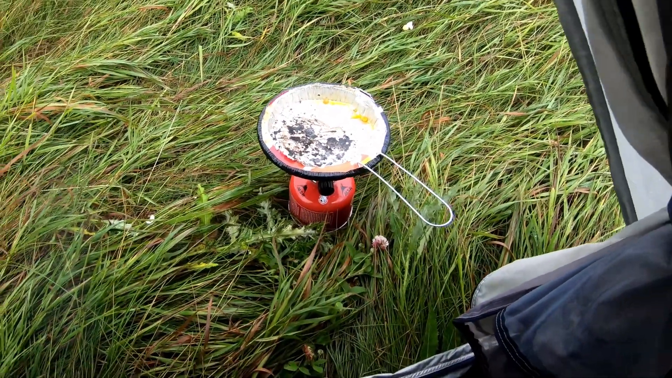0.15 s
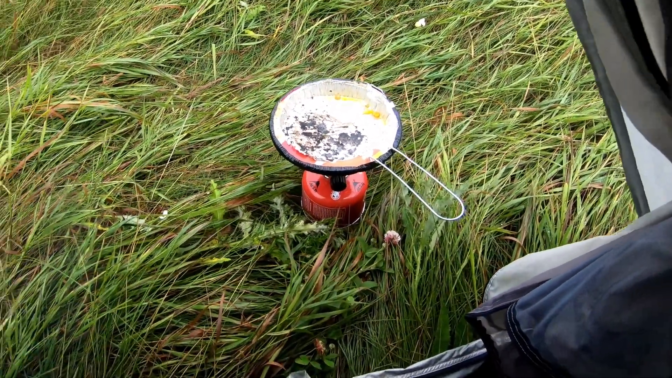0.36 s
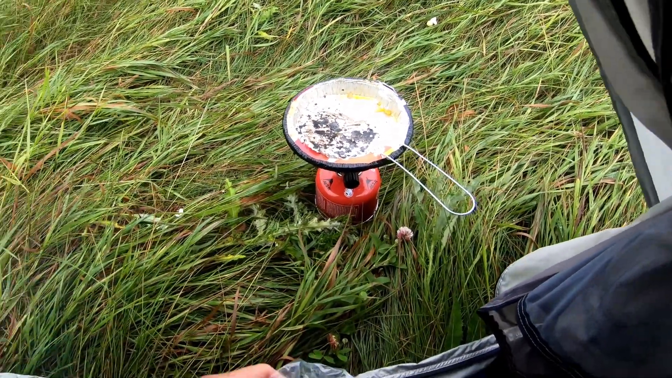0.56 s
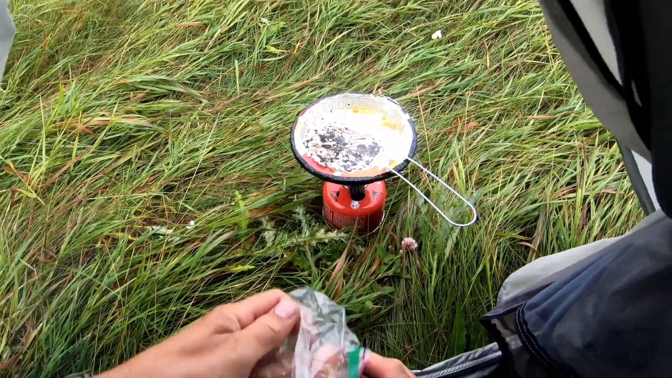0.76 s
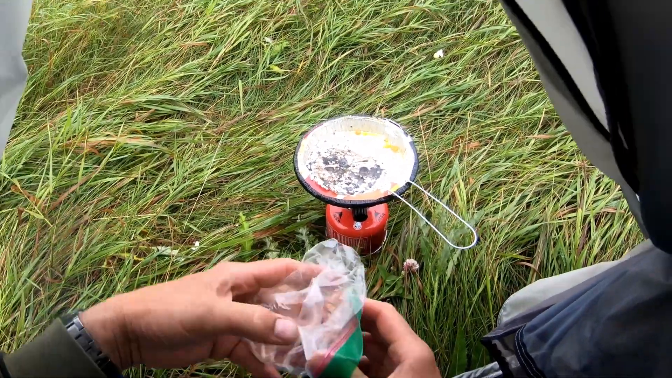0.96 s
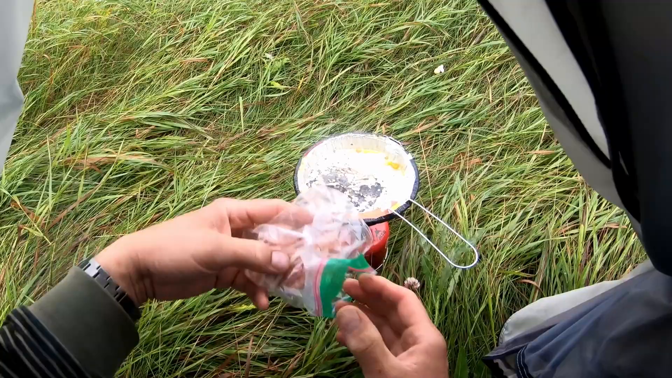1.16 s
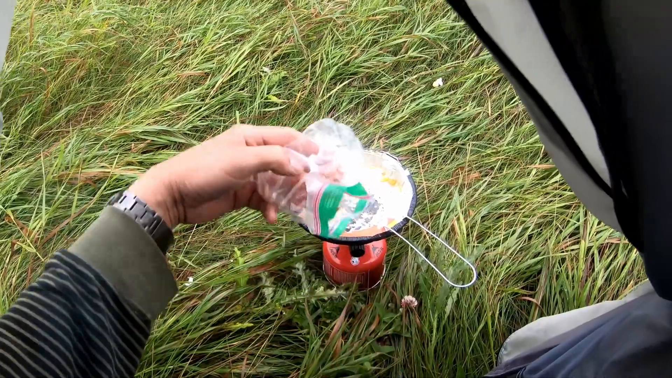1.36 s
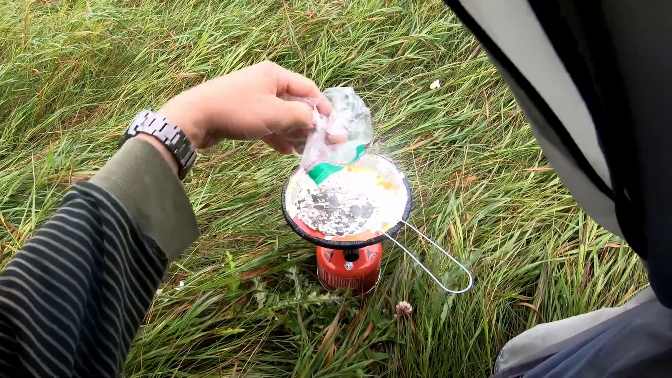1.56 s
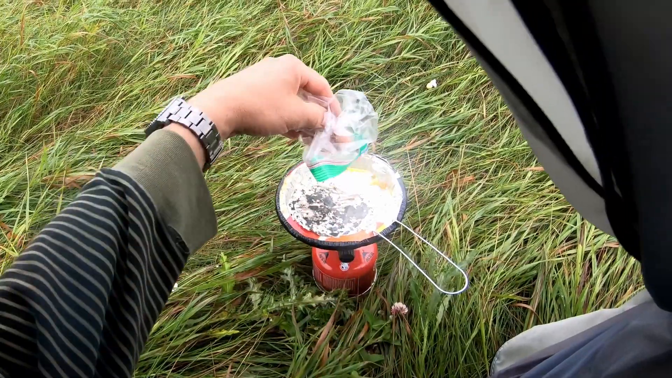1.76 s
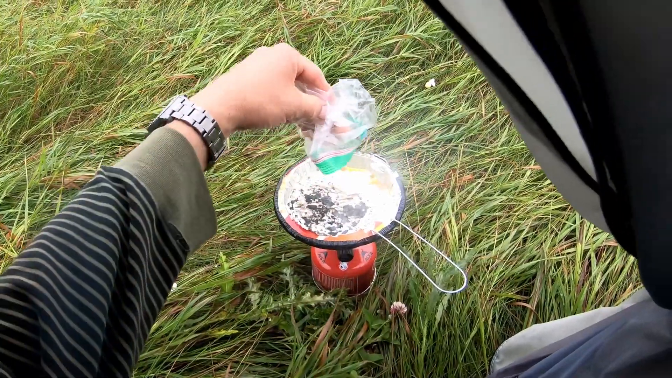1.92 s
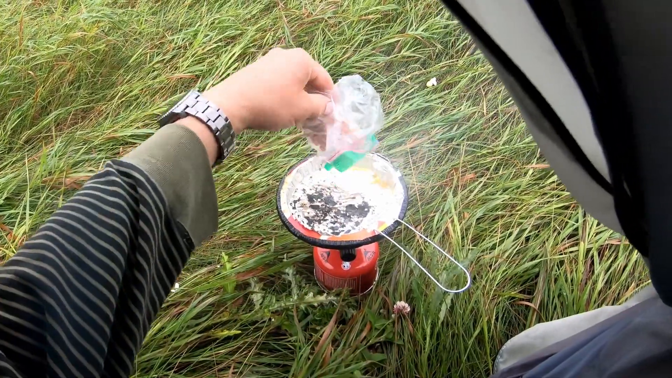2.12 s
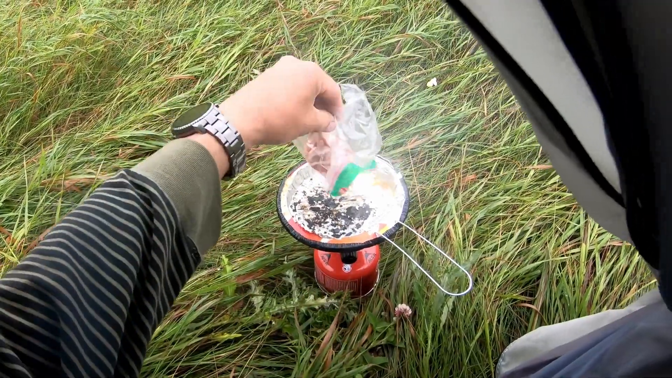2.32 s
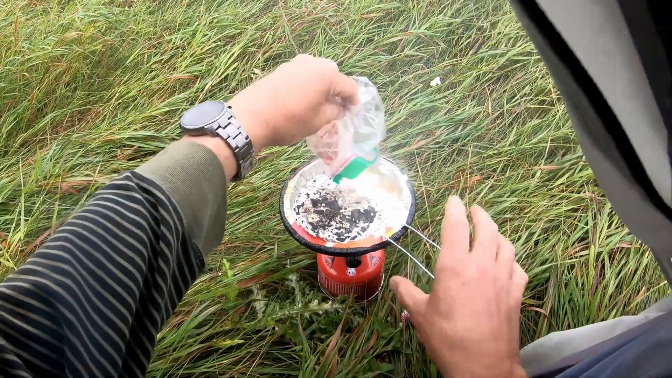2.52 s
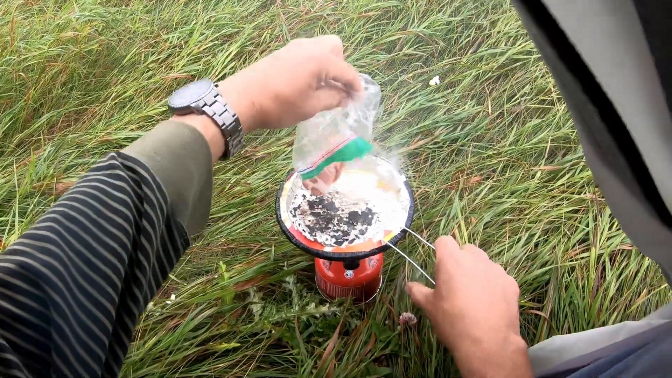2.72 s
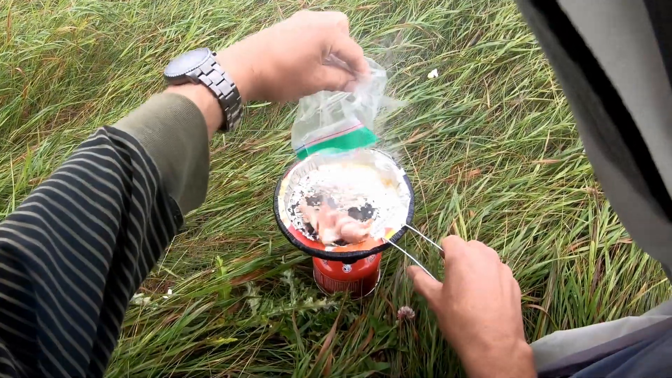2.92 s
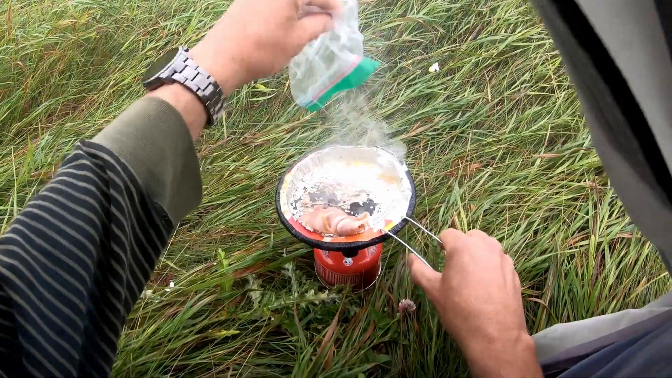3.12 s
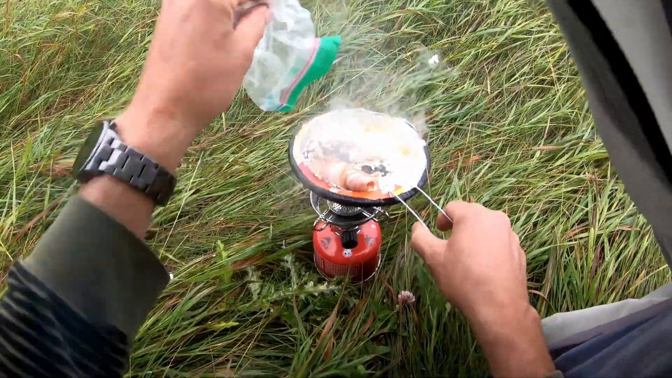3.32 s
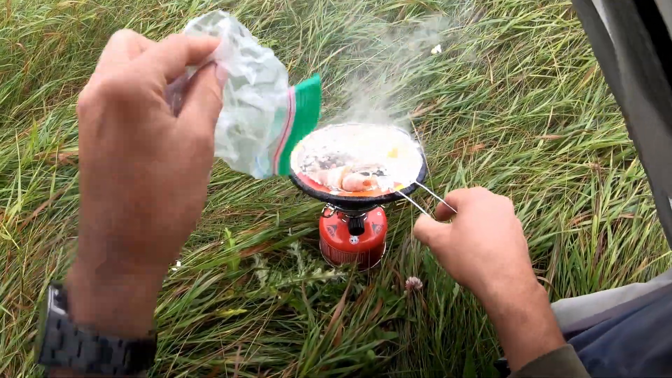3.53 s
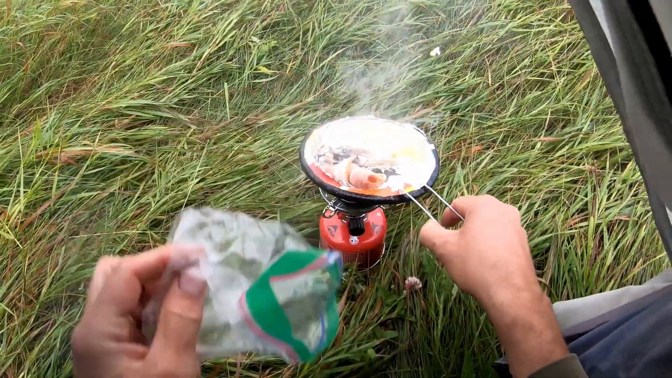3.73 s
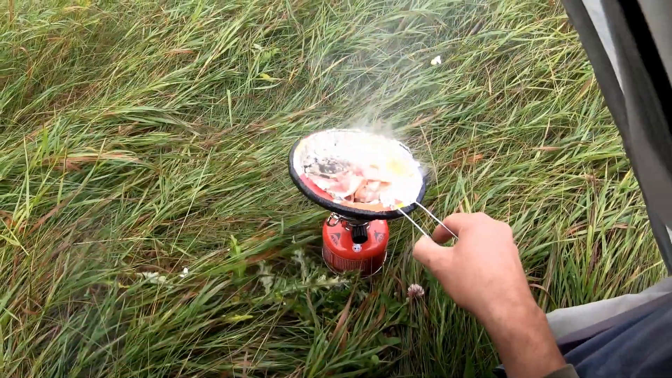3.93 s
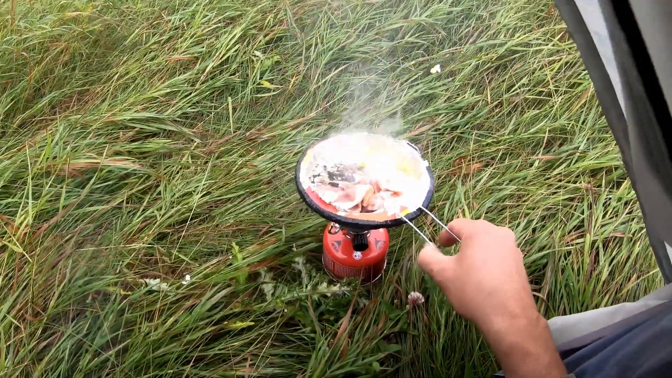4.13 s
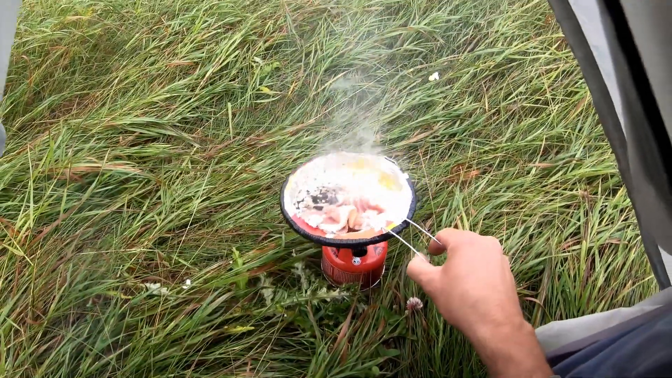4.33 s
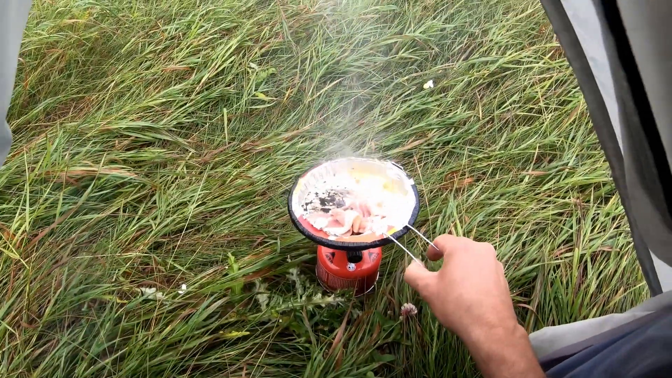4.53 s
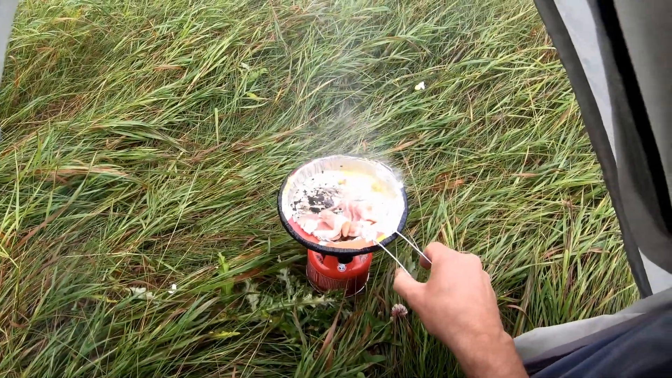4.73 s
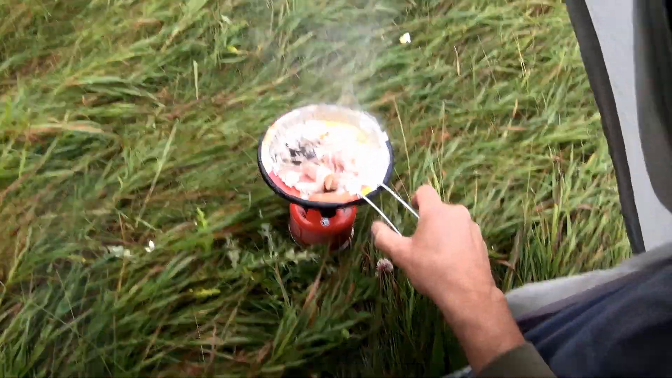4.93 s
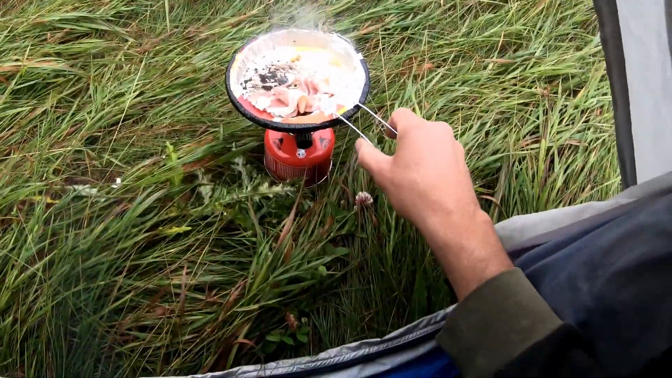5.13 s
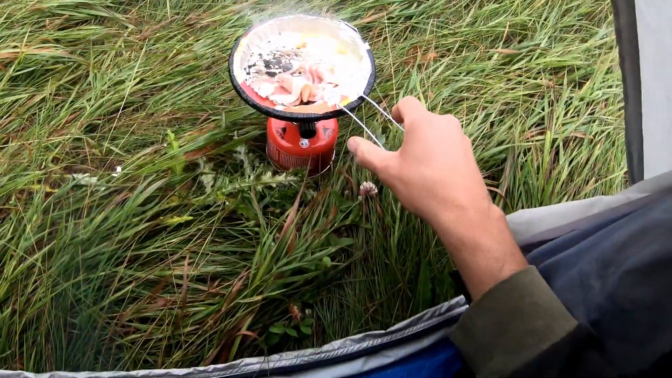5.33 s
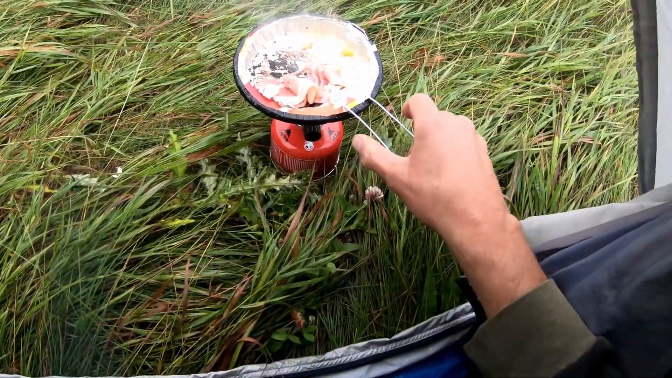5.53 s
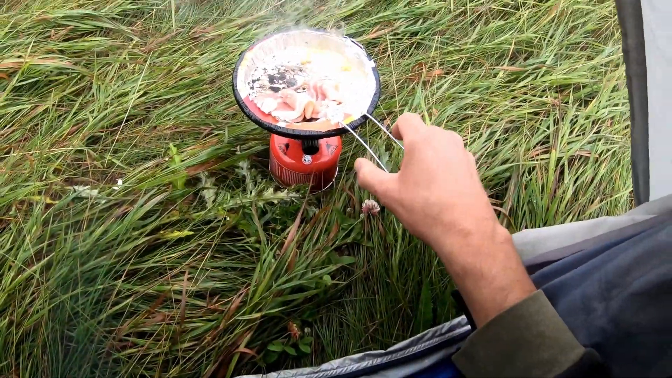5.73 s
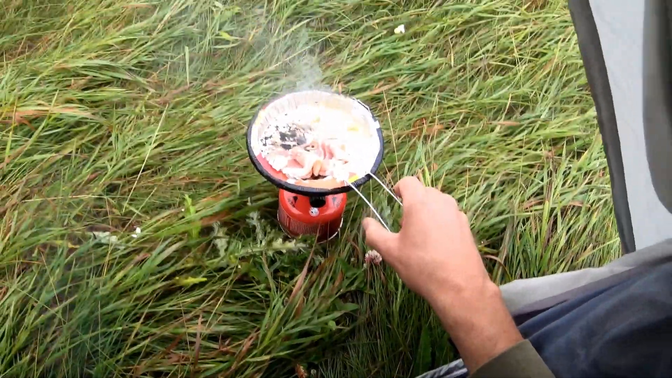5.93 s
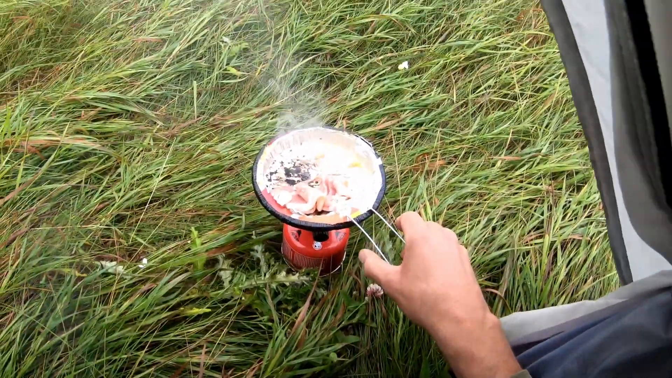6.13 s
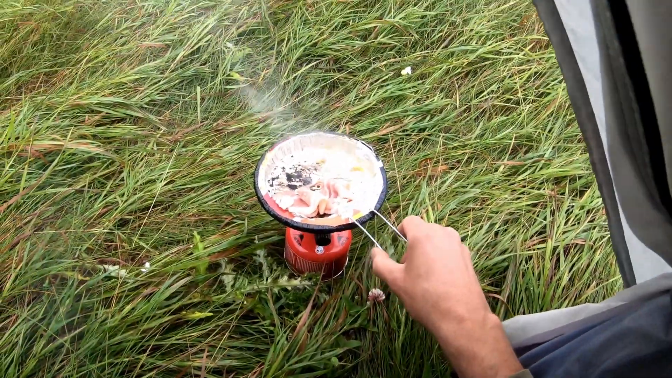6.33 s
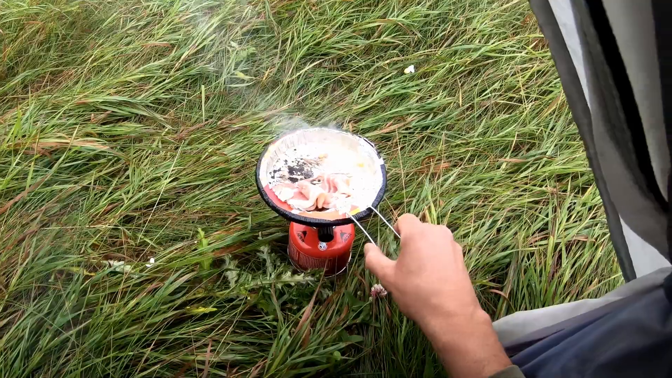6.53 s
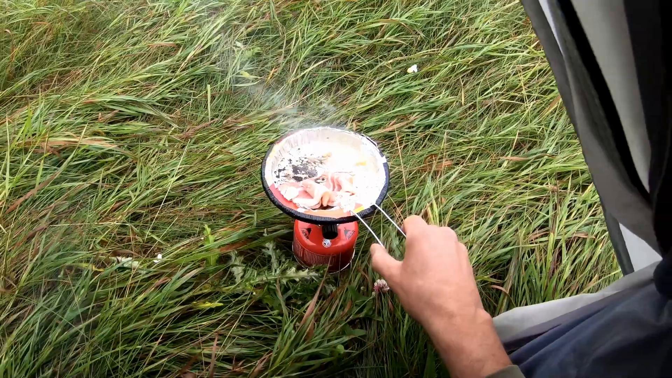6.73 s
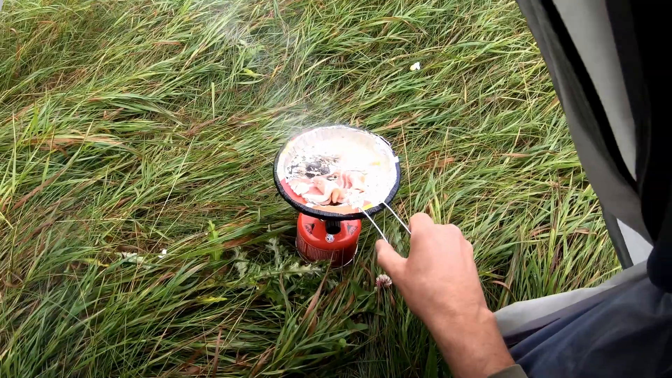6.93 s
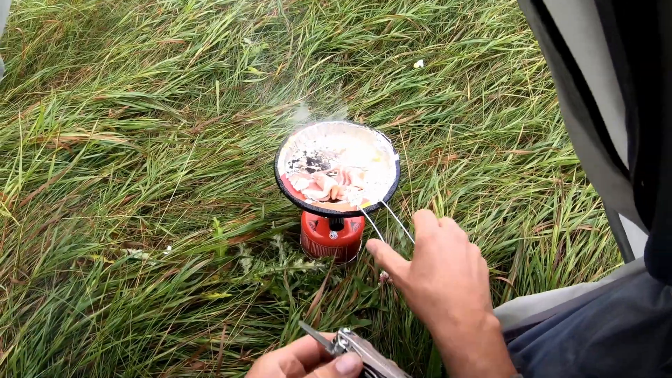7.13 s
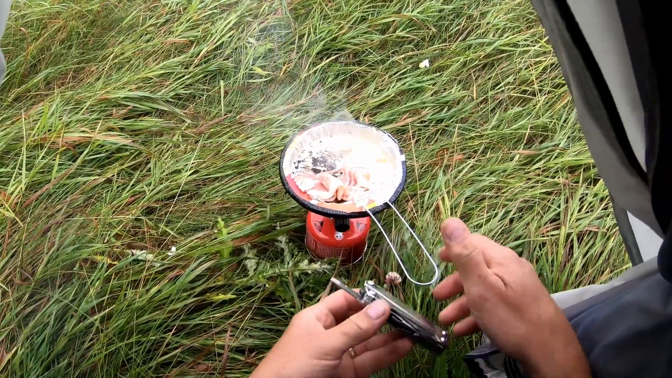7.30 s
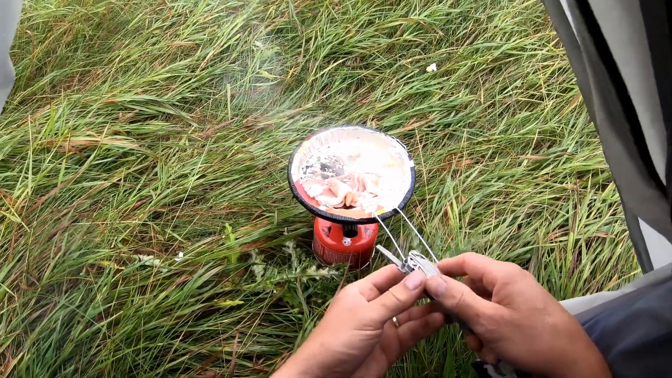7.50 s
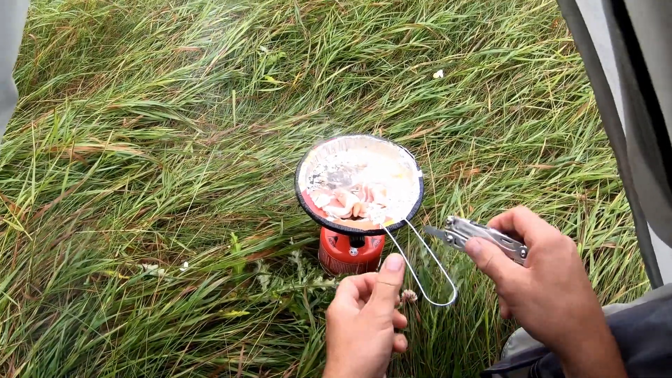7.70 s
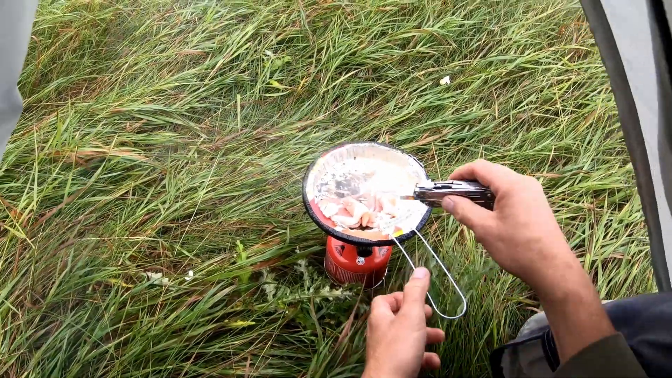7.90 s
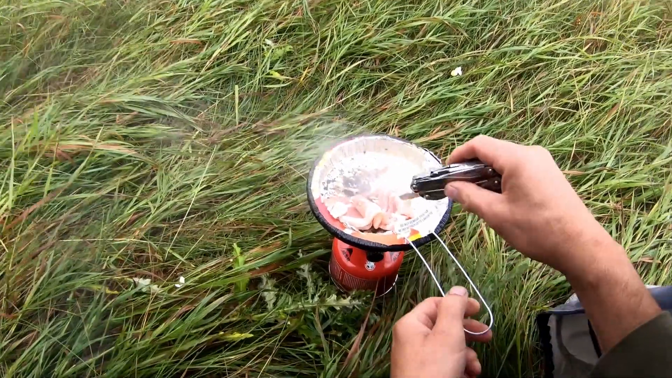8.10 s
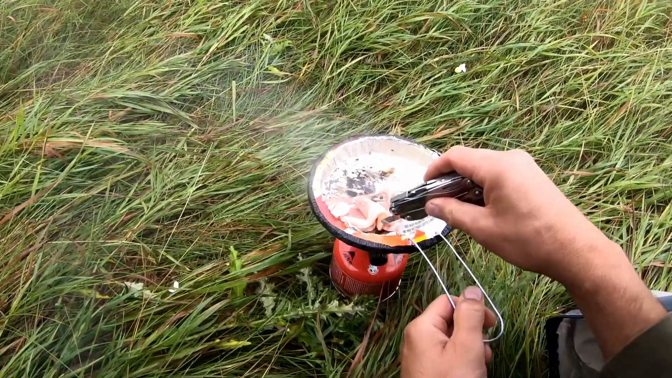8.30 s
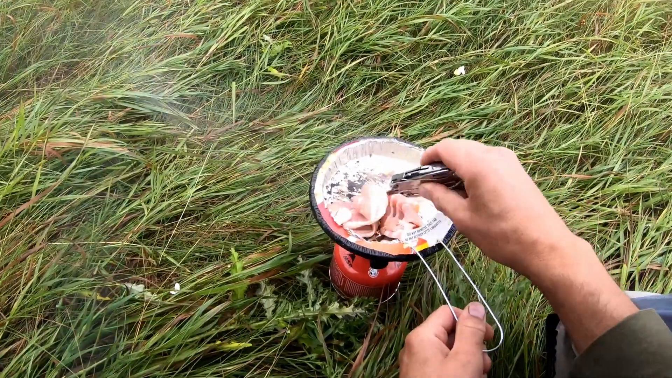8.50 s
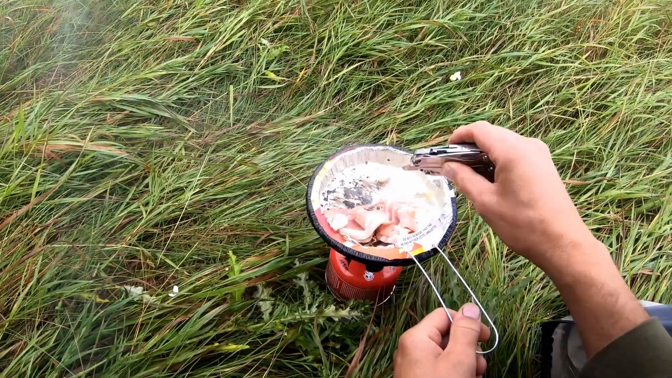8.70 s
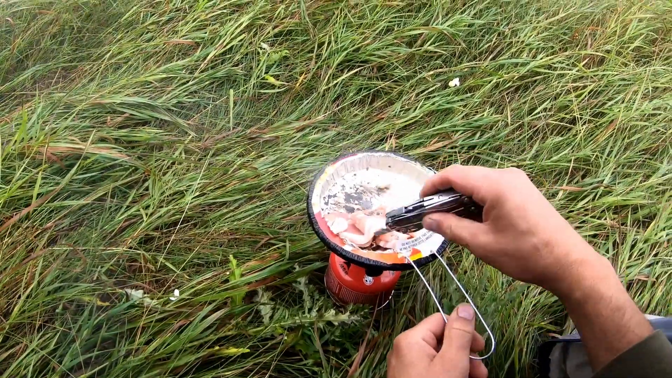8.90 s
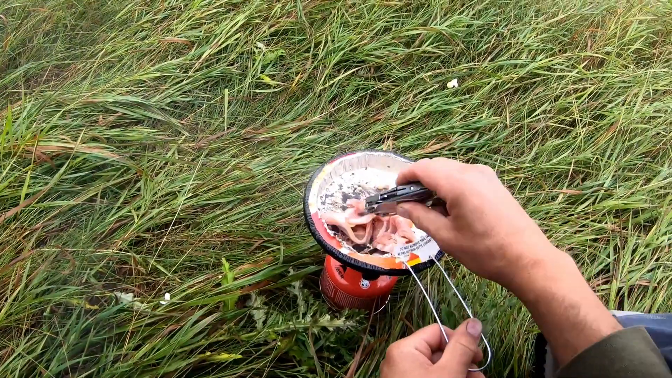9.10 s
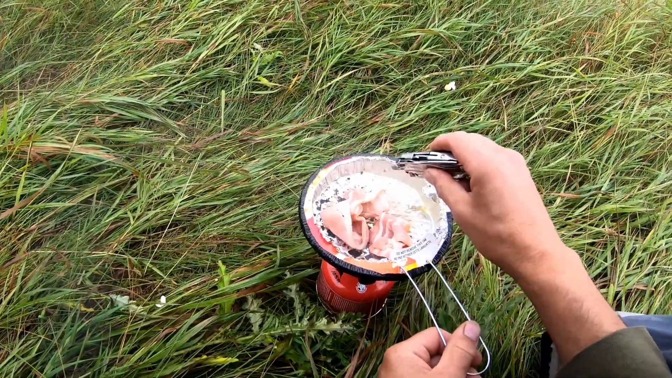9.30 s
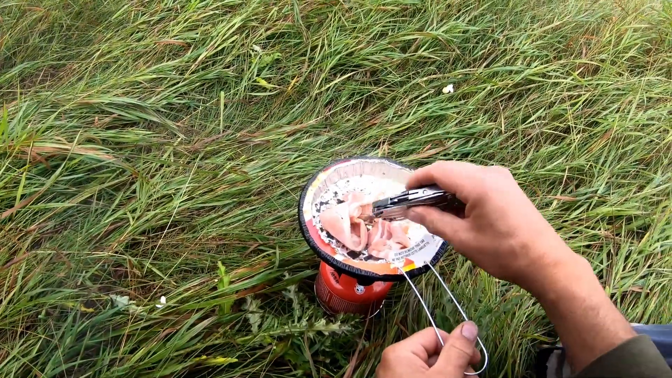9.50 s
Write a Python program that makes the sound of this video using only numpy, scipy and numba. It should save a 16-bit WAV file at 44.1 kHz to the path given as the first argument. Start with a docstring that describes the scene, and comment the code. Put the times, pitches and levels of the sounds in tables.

```python
"""Outdoors, in grass by a tent, a gas burner roars softly as low band-limited noise and a breeze rumbles in gusts.
For the first 2.9 s a plastic bag is shaken: avalanches of clicks crinkle through the film's gliding resonances.
Bacon then drops into a hot foil-lined pan: random bubble clicks, tinted by drifting resonances, make the sizzle.
Fat pops as damped rings, most densely near 4 s as the pan is shifted, amid dull thuds that sink in pitch.
After 8.3 s pliers scrape the foil in stick-slip bursts, and the sizzle flares as they turn the rashers."""
import sys
import numpy as np
from scipy import signal
from scipy.fft import rfft, irfft, next_fast_len
from scipy.io import wavfile
from scipy.ndimage import uniform_filter1d
from numba import njit

SR = 44100
rng = np.random.default_rng(int(sys.argv[2]) if len(sys.argv) > 2 else 0)


def put_to_file(sound):
    """Save the sound as 16-bit audio at rate SR, in the file named by the first command-line argument."""
    columns = np.atleast_2d(sound).T  # one column per channel
    safe = np.clip(columns, -1, 1)
    whole_steps = np.round(safe * 32767)
    wavfile.write(sys.argv[1], SR, whole_steps.astype(np.int16))


N = 421155
T = np.arange(N) / SR  # t/s

# Breeze spectrum: f/Hz, level/dB
BREEZE_SPECTRUM = [(15, 0.5), (30, -11), (50, -1.5), (85, -24), (150, -15), (400, -38)]
# Gusts over the ports: start t/s, length/s, level/dB
GUSTS = [(.18, 0.64, -57), (1.59, 0.093, -54), (2.36, 0.099, -50), (3.34, 0.4, -53), (3.9, 0.23, -49),
         (5.03, 0.076, -51), (7.34, .1, -56), (7.74, .08, -51), (8.09, 0.096, -46), (8.42, .06, -51)]
GUST_ATTACK_S, GUST_RELEASE_S = 0.047, 0.095
CALM_DB, CALM_WANDER_DB = -67.5, 6  # the air between gusts

# Gas flame spectrum: f/Hz, level/dB
BURNER_SPECTRUM = [(40, -27), (80, -7.5), (115, -7), (135, -5), (160, 3.5), (195, 0), (250, -9.5),
                   (400, -23), (1000, -18), (4000, -21), (15000, -33)]
BURNER_DB = -52

# Soft contacts of bacon, bag and hands: t/s, relative level/dB, first f/Hz, last f/Hz, decay/s
BUMPS = [(2.419, -38, 800, 330, .005), (2.818, -36, 750, 450, .003), (2.892, -33, 300, 288, 0.015),
         (2.927, -30.5, 725, 300, 0.0073), (3.934, -34, 400, 400, .003), (3.951, -31, 473, 470, 0.0036),
         (4.048, -33, 340, 330, .004), (4.087, -16.5, 310, 260, 0.002), (4.134, -23.5, 193, 188, 0.0028),
         (4.133, -31, 484, 330, 0.0036), (4.462, -29, 437, 416, 0.0018), (6.078, -36, 230, 225, 0.0043),
         (6.106, -34, 260, 255, .004), (8.179, -34.5, 112, 110, 0.005), (8.424, -33.5, 205, 200, 0.0048)]
BUMP_SAG_S = 0.0039  # time constant of the fall in pitch

# Hollow pops of fat and foil: t/s, relative level/dB, ring f/Hz, crack level relative to the ring/dB
POPS = [(3.245, -28.5, 1370, 1), (3.934, -14.5, 1923, -3), (3.9505, -14.5, 1380, -2),
        (3.971, -30, 1500, -6), (3.992, -26, 530, -17), (4.009, -25.5, 1620, 5), (4.0645, -23.5, 1120, -6),
        (4.0705, -34, 1200, -8), (4.131, -27, 890, -10), (4.143, -37, 1500, -6), (4.1491, -23, 1510, -2),
        (4.347, -6.5, 1730, -10), (4.463, -15, 1740, -28), (4.476, -20, 1710, -5), (4.481, -23, 1705, -10),
        (4.6244, -12.5, 1470, 1), (4.630, -22, 1270, -3), (4.6532, -19, 1780, -14), (4.664, -20, 1630, -5),
        (4.67, -22, 2700, -8), (4.736, -32, 3400, 7), (5.746, -36, 2730, -3), (6.682, -27, 1700, -4),
        (8.28, -24, 2620, 5), (9.253, -27.5, 1090, -16), (9.317, -22.5, 610, -4)]
# Modes of the pan under a pop: f/Hz, relative level/dB, decay/s
PAN_MODES = [(530, -30, 0.0031), (726, -10.5, 0.00086), (1300, -23, 0.0044), (2660, -9.5, 0.0013),
             (3740, -5.5, 0.0012)]

# Pliers scraping over foil: start t/s, length/s, ring level/dB, grit level relative to the ring/dB
SCRAPES = [(8.314, 0.009, -44, 8), (8.38, 0.0075, -30, -10), (8.41, 0.005, -33, -7),
           (8.418, 0.006, -36, -5), (8.428, 0.005, -36, -3), (8.462, 0.035, -38.5, 4),
           (8.519, 0.013, -35, 6), (8.626, 0.013, -45, 7.5)]
# Resonances of the pliers: f/Hz, width/Hz, relative level/dB
PLIERS_MODES = [(2620, 63, 2), (3240, 140, -11)]
SCRAPE_ATTACK_S, SCRAPE_RELEASE_S = 0.003, 0.0033

# Bag spectrum: f/Hz, level/dB
BAG_SPECTRUM = [(88, -37), (150, -2.5), (326, -8), (436, -10), (519, -15.5), (844, -9), (1240, -10.5),
                (1600, -1.5), (1870, -2.5), (2810, -2.5), (3830, -4), (6860, 1), (8660, -4), (11100, -18),
                (15500, -33)]
# Level difference of the bag, left minus right: f/Hz, level/dB
BAG_SIDE = [(200, 0), (900, -5), (2000, -3.5), (2800, -4.5), (3400, -2.5), (6000, 0.5), (7600, -2),
            (8600, 4), (11000, 1), (15000, 5)]
# Grip on the bag: t/s, creak level between crumples/dB, low rustle of film and sleeve relative to it/dB,
# brightness/dB, buckles per second
GRIP = [(0.0, -38.5, -1, -1, 280), (.92, -41.5, -5.5, -2.5, 290), (1.12, -39, -12, -7, 380),
        (1.28, -44, -6, -1.5, 170), (1.35, -45, -17.5, 2, 200), (1.55, -43, -5.5, -5, 420),
        (1.61, -48.5, -9, -2, 320), (1.7, -47, -7, 5, 150), (1.8, -53.5, -10, 0, 100),
        (2.15, -49, -6, 6, 92), (2.24, -43.5, -12, 1.5, 1500), (2.42, -44.5, 0.5, 0.5, 590),
        (2.55, -47.5, -6.5, 3.5, 640), (2.62, -44.5, -10.5, -4, 440), (2.8, -39, -5, -1.5, 260),
        (2.91, -44, 0, -7, 380)]
BAG_UNREST_DB = 2  # unevenness of the creak
# Hands crumple or shake the bag: start t/s, length/s, relative crinkle level/dB
CRUMPLES = [(0.0, 0.04, -37.5), (.08, 0.15, -47), (.23, 0.2, -38), (.42, 0.063, -38.5), (.555, 0.17, -38),
            (.76, 0.1, -39.5), (.825, .15, -36), (1.005, .29, -37), (1.47, 0.15, -43.5), (1.868, .1, -48.5),
            (2.255, 0.025, -41), (2.48, 0.04, -44), (2.595, 0.023, -41.5), (2.7, 0.038, -39),
            (2.74, 0.046, -38.5), (2.785, 0.046, -48), (2.848, 0.053, -40.5)]
CRUMPLE_ATTACK_S, CRUMPLE_RELEASE_S = 0.0076, 0.0044
FOLD_WANDER_DB, FOLDS_PER_S = 2, 90  # each fold favours its own part of the spectrum
# Resonant hollows of the film: start t/s, end t/s, first f/Hz, last f/Hz, width/Hz, level/dB (negative: notch)
BAG_HOLLOWS = [(0.042, 0.59, 3440, 3100, 360, 6.5), (1.01, 1.4, 2400, 2900, 500, 12),
               (1.37, 1.6, 1600, 1550, 440, 10.5), (1.17, 1.57, 4350, 4000, 540, 8),
               (1.3, 2.84, 1080, 1030, 150, -6), (1.6, 2.9, 7000, 6800, 410, 2.5),
               (2.07, 3.201, 2000, 1800, 710, 4), (0.068, 0.9, 300, 350, 170, 4),
               (1.2, 2.06, 3100, 3250, 350, -6), (2.77, 3, 4600, 4150, 290, -11)]
# Loudest creases: t/s, relative level/dB, ring f/Hz
CREASES = [(0.029, -15, 3200), (0.0746, -10, 6860), (0.0995, -11.5, 2530), (0.1084, -13, 7090),
           (0.144, -15.5, 2470), (0.21, -15.5, 2150), (0.236, -23, 3430), (0.2444, -18, 3450),
           (0.3035, -13, 2030), (0.333, -15, 6870), (0.4245, -16, 6140), (0.4335, -9, 3330),
           (0.487, -11, 5300), (0.566, -12, 6340), (0.595, -12, 7350), (0.652, -9.5, 6540),
           (0.7034, -21, 6800), (0.7194, -21, 5540), (0.871, -18, 6320), (0.8855, -10.5, 6140),
           (0.9233, -14, 2050), (0.9584, -15, 3460), (1.061, -9, 2700), (1.074, -15, 2610),
           (1.1237, -12, 2770), (1.169, -14.5, 4650), (1.293, -17, 5870), (1.309, -14, 5860),
           (1.329, -21.5, 2700), (1.391, -19, 4400), (1.509, -15.5, 4600), (1.536, -17, 4000),
           (1.5762, -14, 5800), (1.687, -19, 5190), (1.735, -27, 4200), (1.799, -17, 6800),
           (1.887, -23, 5840), (1.905, -24, 1550), (1.968, -23, 2290), (2.002, -21.5, 6130),
           (2.268, -18.5, 1700), (2.32, -27, 6000), (2.402, -18, 1670), (2.503, -17, 4220),
           (2.649, -21, 6800), (2.7564, -17.5, 3340), (2.8679, -24, 1760), (2.8774, -20, 1750)]
# Random smaller creases: events per second, mean level above the crinkle/dB, spread/dB, lowest f/Hz, highest f/Hz
STRAY_CREASES = (15, 17.4, 2, 1000, 8200)
CREASE_DECAY_S = 0.0021

# Frying spectrum: f/Hz, level/dB
FRY_SPECTRUM = [(180, -17.5), (300, -13), (500, -11.5), (750, -5), (950, -10.5), (1250, -2.5), (2000, -3.5),
                (2650, 0.5), (3020, -2.5), (3350, 2), (4900, -1), (6000, 1.5), (7250, -2), (7950, -6.5),
                (8800, -4), (9950, -9), (10600, -17), (11500, -17), (15500, -28)]
# Level difference of the frying, left minus right: f/Hz, level/dB
FRY_SIDE = [(200, -4), (1200, -1), (2100, -3), (2750, -6), (3400, -1.5), (4400, 0), (6000, 0), (7400, -2),
            (8500, 4), (11000, 1), (15000, 5)]
# Heat of the frying: t/s, sizzle level/dB, wet splutter relative to it/dB, fine fizz relative to it/dB
FRYING = [(2.96, -44, -10, -1), (3.13, -38.5, -9.5, 0.5), (3.68, -41, -10, -3), (4.08, -40, -5, -5),
          (4.3, -33, -12.5, -10), (4.9, -37, -11.5, -6), (5.05, -33, -11, -7.5), (5.7, -33.5, -12, -8),
          (6.2, -38, -9, -3), (7.1, -39, -9, -2.5), (8.12, -39.5, -10.5, -3.5), (8.38, -35.5, -12, -2),
          (9.06, -38, -12.5, 0), (9.22, -33, -13.5, 0), (9.55, -38, -12, 1.5)]
# Fresh wet meat meets hot foil: start t/s, length/s, flare level/dB, wet splutter relative to it/dB
FLARES = [(3.071, 0.012, -32.5, -12), (3.719, 0.05, -38.5, -29), (3.789, 0.025, -34, -17),
          (3.84, 0.12, -36.5, -10.5), (4.06, 0.081, -57, 18.5), (4.22, 0.067, -36.5, -7),
          (4.357, 0.056, -32, -10), (4.448, 0.094, -33.5, -12), (4.626, 0.059, -33, -11.5),
          (5.63, 0.11, -42.5, 2), (8.448, 0.2, -39, -6), (8.512, 0.059, -34, -6), (8.75, 0.07, -38.5, -16),
          (9.124, 0.097, -37, -8)]
FLARE_ATTACK_S, FLARE_RELEASE_S = 0.0043, 0.02
# Drifting peaks and notches in the frying's colour, as the phone and reflections shift:
# start t/s, end t/s, first f/Hz, last f/Hz, width/Hz, level/dB (negative: notch)
FRY_DRIFTS = [ (3.0, 4.0, 4060, 4090, 650, -3.5), (3.05, 3.37, 5760, 5840, 260, -9),
              (3.05, 3.44, 7500, 7500, 700, 7.5), (3.07, 3.54, 2330, 2380, 500, 6.5),
              (3.08, 4.7, 1330, 1340, 180, 4.5), (3.5, 3.95, 5400, 5440, 350, 3.5),
              (4.0, 4.94, 6020, 5830, 500, -4.5), (4.15, 4.7, 3440, 3400, 150, 1),
              (4.15, 4.95, 3780, 3730, 220, 2.5), (4.2, 4.65, 4450, 4700, 300, 2.5),
              (4.15, 4.95, 6700, 6960, 600, 2.5), (4.18, 5.57, 9230, 9300, 490, -3),
              (4.2, 4.88, 2280, 2240, 280, -3.5), (4.38, 5.36, 4160, 3970, 250, -6),
              (4.72, 5.12, 3560, 3280, 240, 4.5), (4.8, 6.412, 277, 276, 160, 8.5),
              (5.05, 5.89, 2030, 1850, 540, -5.5), (5.12, 5.96, 3540, 3500, 500, -6),
              (5.1, 5.85, 2520, 2680, 350, 3.5), (5.28, 5.83, 10300, 10080, 700, 8),
              (5.424, 5.82, 8660, 8720, 620, 8), (5.97, 7.05, 860, 860, 180, 2.5),
              (5.95, 6.95, 3280, 3440, 220, 4.5), (6.19, 7.01, 4570, 4720, 130, 0),
              (6.5, 8.07, 1640, 1640, 300, 4.5), (6.54, 7.71, 2440, 2440, 210, -7),
              (6.77, 7.75, 9900, 9700, 300, 8), (6.82, 8.1, 5830, 5950, 700, 3),
              (6.83, 7.71, 4220, 4200, 250, -5.5), (6.96, 8.1, 3930, 3820, 200, 4.5),
              (7.06, 7.8, 7000, 7300, 330, 4.5), (7.13, 8.17, 1260, 1270, 150, -10),
              (7.2, 8.05, 930, 910, 200, 4), (7.21, 8.04, 560, 550, 190, -11),
              (8.17, 9.51, 5900, 6000, 520, -6.5), (8.23, 9.11, 7600, 7900, 700, 7),
              (8.26, 9.25, 5010, 5230, 700, -5), (8.28, 9.48, 1400, 1350, 190, -3),
              (8.41, 9.41, 3220, 3170, 130, 4.5), (8.3, 9.4, 1130, 1130, 100, 9),
              (8.71, 9.52, 2900, 2830, 150, -5.5), (8.2, 9.54, 625, 614, 220, 5),
              (9.02, 9.39, 3740, 3760, 160, 5), (9.09, 9.44, 5570, 5560, 190, 5),
              (9.14, 9.51, 8900, 8700, 260, -5)]
# Random narrow resonances, brief faint whistling tints in the sizzle: events per second, shortest/s, longest/s,
# lowest f/Hz, highest f/Hz, largest drift as a share of f, width/Hz, level/dB
WHISTLING_TINTS = (5, 0.15, 0.41, 1770, 8100, 0.04, 110, 2.8)
FAT_TICK_DB = -26  # random fat ticks, relative to the sizzle
# Loudest spits of steam: t/s, relative level/dB, ring f/Hz
SPITS = [(2.9294, -16.5, 7900), (2.9366, -12.5, 4900), (3.075, -13.5, 7040), (3.466, -25.5, 2700),
         (3.74, -19, 2800), (3.593, -22.5, 5800), (3.796, -19, 3380), (5.4211, -18, 2790),
         (5.7455, -13.5, 2650), (8.962, -20.5, 4600)]
# Random smaller spits: events per second, mean level above the sizzle/dB, spread/dB, lowest f/Hz, highest f/Hz
STRAY_SPITS = (28, 4.1, 4.3, 1600, 7560)
SPIT_DECAY_S = 0.0066
# Lone short dry ticks, of fat or of handled pliers: t/s, relative level/dB, ring f/Hz
DRY_TICKS = [(6.821, -22, 6000), (6.860, -22.5, 3500), (6.937, -16, 3200), (6.960, -18.5, 2900),
             (7.192, -22, 5700), (7.438, -26, 5800), (7.459, -23, 6200), (7.5334, -18, 5930),
             (7.587, -18, 2700), (7.7479, -16.5, 7320), (8.627, -16, 3500), (9.434, -17, 6700)]

# Share of direct sound at the two ports: f/Hz, share (clipped to 0-1)
DIRECT_SHARE = [(200, 0.93), (700, 0.77), (1200, 0.64), (2200, 0.73), (2900, 0.5), (3900, 0.84),
                (5000, 0.5), (6300, 4.5), (7600, -2), (8700, 0.5), (11000, 2.5), (15000, -0.5)]
# Phase by which the left port leads: f/Hz, phase/rad
LEFT_LEAD = [(200, 0), (800, 0.6), (1200, 0.1), (2500, 0.5), (3100, 0.8), (3900, 0.14), (6000, 1.2),
             (7200, 1.5), (8200, 3), (10000, 5), (11500, 5), (15000, 3)]
TOP_HZ = 15750  # upper limit of the phone's response


def undb(db):
    """A level in decibels is twenty times the logarithm of the amplitude; this inverts it."""
    return 10 ** (np.asarray(db) / 20)


def unit(x):
    """Normalisation: the mean of the channels gets rms 1."""
    return x / np.std(np.atleast_2d(x).mean(axis=0))


def steady(x, seconds):
    """Automatic levelling: the running rms is held at 1 while faster detail survives."""
    return x / np.sqrt(uniform_filter1d(x.mean(axis=0) ** 2, int(seconds * SR)) + 1e-12)


def curves(table):
    """Linear interpolation joins each column of a time table."""
    s, *columns = np.transpose(table)
    return [np.interp(T, s, column) for column in columns]


def at(table, hz):
    """Interpolation on a logarithmic frequency axis, as hearing spaces pitch."""
    f, value = np.transpose(table)
    return np.interp(np.log(hz + 1), np.log(f), value)


def shaped(x, response):
    """Linear filtering: the spectrum is multiplied by a response given as a function of frequency."""
    size = next_fast_len(N + 4096, True)
    f = np.arange(size // 2 + 1) * SR / size
    return irfft(rfft(x, size) * response(f), size)[..., :N]


def three_bands(x, low_hz, high_hz, seconds):
    """Complementary filtering: lows, mids and highs, each levelled to rms 1."""
    low, below_high = (shaped(x, lambda f: 1 / (1 + (f / hz) ** 8)) for hz in (low_hz, high_hz))
    return [steady(band, seconds) for band in (low, below_high - low, x - below_high)]


def resonate(x, hz, width_hz):
    """A simple resonator: band-pass with gain 1 at the centre."""
    return signal.lfilter(*signal.iirpeak(hz, hz / width_hz, fs=SR), x)


@njit
def gliding(x, hz, width_hz):
    """A state-variable resonator whose centre moves, with gain 1 at that centre."""
    y, band, low = np.empty(len(x)), 0., 0.
    for i in range(len(x)):
        g, k = np.tan(np.pi * hz[i] / SR), width_hz / hz[i]
        v = (band + g * (x[i] - low)) / (1 + g * (g + k))
        band, low, y[i] = 2 * v - band, low + 2 * g * v, k * v
    return y


def ringing(x, table):
    """Moving resonance: gliding peaks fade in and out of a sound, or notches where the level is negative."""
    y = x.copy()
    for start, end, first_hz, last_hz, width_hz, db in table:
        span = slice(max(int((start - .1) * SR), 0), int((end + .1) * SR))
        presence = np.interp(T[span], [start - .1, start + .1, end - .1, end + .1], [0, 1, 1, 0])
        hz = np.interp(T[span], [start, end], [first_hz, last_hz])
        widening = float(undb(-min(db, 0) / 2))  # a deeper notch is broader
        for channel in y:
            band = gliding(channel[span], hz, width_hz * widening)
            channel[span] += (undb(db) - 1) * presence * band
    return y


def pitched(x, grain_s, width_hz, ring_db):
    """Granular resonance: each short grain excites one of 16 resonators drawn at random."""
    pitches = np.linspace(900, 11000, 16)
    grain = (T / max(grain_s, 1e-4)).astype(int)
    choice = rng.integers(len(pitches), size=N)[grain]
    rings = sum(resonate(x * (choice == k) + 1e-18, hz, width_hz) for k, hz in enumerate(pitches))
    return x + undb(ring_db) * rings


def mode(t, hz, decay_s):
    """Free vibration: a sine under exponential damping."""
    return np.sin(2 * np.pi * hz * t) * np.exp(-t / decay_s)


def walk(rate):
    """Slow random fluctuation: `rate` fresh values a second joined by lines, with a spread near 1."""
    return 1.2 * np.interp(T * rate, np.arange(N // 20), rng.standard_normal(N // 20))


def clicks(rate, spread_db):
    """A Poisson-like impulse train: random moments and signs, many small clicks and a few large."""
    size = undb(spread_db * np.minimum(rng.exponential(size=N), 4))
    return (rng.random(N) < rate / SR) * rng.choice([-1, 1], N) * size


def fade(x, seconds):
    """Exponential relaxation: every value becomes a tail of the same area."""
    pole = np.exp(-1 / (seconds * SR))
    return signal.lfilter([1 - pole], [1, -pole], x + 1e-18)


def swells(rows, attack_s, release_s):
    """Incoherent addition: powers of (start, length, dB) gestures that rise, hold and die away are summed."""
    power = np.zeros(N)
    for s, length, db in rows:
        rise = np.clip((T - s) / attack_s, 0, 1)
        fall = np.exp(-np.clip((T - s - length) / release_s, 0, 20))
        power += (undb(db) * rise * fall) ** 2
    return power


def strays(gain, start, end, per_s, db, spread_db, low_hz, high_hz):
    """Random excitation: (s, dB, Hz) events at chance moments whose strength follows a gain curve."""
    when, size, pitch = rng.random((600, 3))[:int((end - start) * per_s)].T
    s = start + (end - start) * when
    dbs = 20 * np.log10(np.interp(s, T, gain)) + db + spread_db * (2 * size - 1)
    return list(zip(s, dbs, low_hz * (high_hz / low_hz) ** pitch))


def add(track, s, sound):
    """Superposition: a sound is summed in at time s."""
    start = max(int(s * SR), 0)
    track[..., start:start + sound.shape[-1]] += sound[..., :N - start]


def ports(direct, scattered, side):
    """Partial coherence: direct sound has a phase gap between the two ports, scattered sound differs at each."""
    ear = np.array([[1], [-1]])
    share = lambda f: np.clip(at(DIRECT_SHARE, f), 0, 1)
    turn = lambda f: np.exp(1j * at(LEFT_LEAD, f) * np.array([[1], [0]]))
    # offset the loss when the two channels are averaged
    mean_gain = lambda f: np.sqrt((1 + share(f) * np.cos(at(LEFT_LEAD, f))) / 2 + 1e-3)
    shade = lambda f: undb(ear * at(side, f) / 2) / mean_gain(f)
    coherent = shaped(direct, lambda f: np.sqrt(share(f)) * turn(f) * shade(f))
    return coherent + shaped(scattered, lambda f: np.sqrt(1 - share(f)) * shade(f))


def crackle(pulses, spectrum, side, scatter_s):
    """Scattering: nearby surfaces smear each click briefly, in the colour of its source."""
    smear = rng.standard_normal((2, N)) * np.sqrt(fade(pulses ** 2, scatter_s))
    return shaped(ports(pulses, smear, side), lambda f: undb(at(spectrum, f)))


def bursts(table, spectrum, side, width_hz, broad_db, rise_s, decay_s):
    """Transient excitation: one resonance over broad hiss swells and dies within milliseconds."""
    track, t = np.zeros((3, N)), T[:4096]
    tint = undb(at(spectrum, np.fft.rfftfreq(len(t), 1 / SR)))
    swell = (1 - np.exp(-t / rise_s)) ** 2 * np.exp(-t / decay_s)
    for s, db, hz in table:
        noise = irfft(rfft(rng.standard_normal((3, len(t)))) * tint)
        burst = unit(resonate(noise, hz, width_hz) + undb(broad_db) * noise)
        add(track, s, undb(db) * burst * swell / swell.max())
    return ports(track[0], track[1:], side)


def breeze():
    """Turbulence: eddies rumble on the ports, more on the right, and gusts rise out of wandering air."""
    noise = rng.standard_normal(N) + 1.0 * rng.standard_normal((2, N))
    rumble = shaped(noise, lambda f: undb(at(BREEZE_SPECTRUM, f))) * undb([[-7], [0]])
    calm = undb(CALM_DB + CALM_WANDER_DB * walk(7))
    wind = np.sqrt(calm ** 2 + swells(GUSTS, GUST_ATTACK_S, GUST_RELEASE_S))
    return steady(rumble, seconds=0.32) * wind


def burner():
    """Combustion noise: the gas flame roars in a low band, nearly alike at both ports."""
    noise = rng.standard_normal(N) + 0.35 * rng.standard_normal((2, N))
    roar = unit(shaped(noise, lambda f: undb(at(BURNER_SPECTRUM, f))))
    return roar * undb(BURNER_DB + 0.72 * walk(7.7))


def bumps():
    """Damped impact: soft bodies thud dully, and the pitch sinks as the contact spreads."""
    track, t = np.zeros(N), T[:4096]
    for s, db, first_hz, last_hz, decay_s in BUMPS:
        hz = last_hz + (first_hz - last_hz) * np.exp(-t / BUMP_SAG_S)
        swell = np.exp(-t / decay_s) * (1 - np.exp(-t / 0.0023))
        add(track, s, undb(db) * np.sin(2 * np.pi * np.cumsum(hz) / SR) * swell)
    return undb(7.5) * track


def pops():
    """Impulsive release: a bursting blister snaps, rings a few cycles, knocks the pan and cracks with spray."""
    track, t = np.zeros((2, N)), T[:2048]
    knock = sum(undb(db) * mode(t, hz, decay_s) for hz, db, decay_s in PAN_MODES)
    opening = 1 - np.exp(-t / .0003)
    snap = undb(6.5) * mode(t, hz=4600, decay_s=0.0001)
    crack_band = signal.butter(2, [500, 6000], "band", fs=SR, output="sos")
    for s, db, hz, crack_db in POPS:
        ring = (mode(t, hz, 0.0016) - knock) * opening
        spray = undb(-5.5) * rng.standard_normal((2, len(t))) * np.exp(-t / 0.0048)
        crack = signal.sosfilt(crack_band, snap + spray)
        pop = ring / np.abs(ring).max() + undb(crack_db) * crack
        add(track, s + 0.001363, undb(db) * pop)  # onset lags the tabled time
    # so small a source radiates little bass
    bass_cut = signal.butter(2, 330, "high", fs=SR, output="sos")
    return signal.sosfilt(bass_cut, track) * undb([[0.8], [3.2]])


def pliers():
    """Stick-slip friction: the jaws slip on the foil, and each slip rings the steel and throws off grit."""
    slips = crackle(clicks(rate=1500, spread_db=2.0), FRY_SPECTRUM, FRY_SIDE, scatter_s=0.00054)
    ring = sum(undb(db) * resonate(slips, hz, width_hz) for hz, width_hz, db in PLIERS_MODES)
    ring_rows = [(s, length, db) for s, length, db, grit_db in SCRAPES]
    grit_rows = [(s, length, db + grit_db) for s, length, db, grit_db in SCRAPES]
    ring_power = swells(ring_rows, SCRAPE_ATTACK_S, SCRAPE_RELEASE_S)
    grit_power = swells(grit_rows, SCRAPE_ATTACK_S, SCRAPE_RELEASE_S)
    return steady(ring, seconds=.03) * np.sqrt(ring_power) + unit(slips) * np.sqrt(grit_power)


def bag():
    """Buckling: the film snaps in avalanches of clicks, until the bacon drops out and it falls silent."""
    creak_db, soft_db, bright_db, buckle_rate = curves(GRIP)
    creak = undb(creak_db + BAG_UNREST_DB * walk(30.11))
    crinkle = np.sqrt(creak ** 2 + swells(CRUMPLES, CRUMPLE_ATTACK_S, CRUMPLE_RELEASE_S))
    effort = 1.4 * crinkle / crinkle.max()

    buckles = np.abs(clicks(rate=buckle_rate, spread_db=2.5)) / np.sqrt(buckle_rate)
    avalanches = fade(buckles, seconds=0.0019)
    drive = 0.95 + 2.8 * effort + avalanches / avalanches.mean()
    pulses = clicks(rate=7000, spread_db=2.5) * drive
    film = crackle(pulses, BAG_SPECTRUM, BAG_SIDE, scatter_s=0.00041)
    film = pitched(film, grain_s=.002, width_hz=520, ring_db=2.5)

    bands = three_bands(ringing(film, BAG_HOLLOWS), 1200, 5000, .07)
    low, mid, high = (band * undb(FOLD_WANDER_DB * walk(FOLDS_PER_S)) for band in bands)
    film = undb(soft_db - 1.6) * low + undb(-2.5) * mid + undb(bright_db - 3.5) * high
    held = np.interp(T, [2.92, 2.95], [1, 0])

    creases = CREASES + strays(crinkle, 0, 2.9, *STRAY_CREASES)
    snaps = bursts(creases, BAG_SPECTRUM, BAG_SIDE, width_hz=370, broad_db=-10.0,
                   rise_s=0.00018, decay_s=CREASE_DECAY_S)
    return film * crinkle * held + undb(-16.0) * snaps


def whistling_tints(start, end, per_s, short_s, long_s, low_hz, high_hz, drift, width_hz, db):
    """Narrow-band resonance: brief faint whistling tints at random, each gliding a little while it lasts."""
    when, life, pitch, glide = rng.random((200, 4))[:int((end - start) * per_s)].T
    s = start + (end - start) * when
    hz = low_hz * (high_hz / low_hz) ** pitch
    rows = zip(s, s + short_s + (long_s - short_s) * life, hz, hz * (1 + drift * (2 * glide - 1)))
    return [(*row, width_hz, db) for row in rows]


def sizzle():
    """Bubble collapse: thousands of steam bubbles burst each second amid fat ticks, tinted by drifting peaks."""
    sizzle_db, wet_db, fizz_db = curves(FRYING)
    flare_rows = [(s, length, db) for s, length, db, wet in FLARES]
    wet_rows = [(s, length, db + wet) for s, length, db, wet in FLARES]
    flares = swells(flare_rows, FLARE_ATTACK_S, FLARE_RELEASE_S)
    wet_flares = swells(wet_rows, FLARE_ATTACK_S, FLARE_RELEASE_S)
    boil = np.sqrt(undb(sizzle_db) ** 2 + flares) * undb(0.64 * walk(10))
    splutter = np.sqrt(undb(sizzle_db + wet_db) ** 2 + wet_flares) * undb(0.74 * walk(21))

    bubbles = unit(clicks(rate=6500, spread_db=2.0)) * undb(0.94 * walk(70))
    ticks = unit(clicks(rate=220, spread_db=1.0))
    hiss = crackle(bubbles + undb(-15.5) * ticks, FRY_SPECTRUM, FRY_SIDE, scatter_s=0.00093)
    hiss = pitched(hiss, grain_s=.0012, width_hz=710, ring_db=0.5)
    resonances = FRY_DRIFTS + whistling_tints(3.0, 9.5, *WHISTLING_TINTS)
    low, mid, high = three_bands(ringing(hiss, resonances), 1800, 5500, .2)
    frying = splutter * undb(-1.14) * low + boil * (undb(-3.0) * mid + undb(fizz_db) * high)
    fat = shaped(unit(clicks(rate=15, spread_db=11.0)), lambda f: undb(at(FRY_SPECTRUM, f)))
    frying = frying + boil * undb(FAT_TICK_DB) * unit(fat)
    in_pan = np.interp(T, [2.93, 2.96], [0, 1])

    spit_rows = SPITS + strays(boil, 3.0, 9.5, *STRAY_SPITS)
    spits = bursts(spit_rows, FRY_SPECTRUM, FRY_SIDE, width_hz=200, broad_db=-14.5,
                   rise_s=0.00096, decay_s=SPIT_DECAY_S)
    dry_ticks = bursts(DRY_TICKS, FRY_SPECTRUM, FRY_SIDE, width_hz=500, broad_db=-11.5,
                       rise_s=0.00019, decay_s=0.0016)
    return frying * in_pan + undb(-14.5) * spits + undb(-13.5) * dry_ticks


def scene():
    """Free field: the sources superpose in open air, with no room around them."""
    return breeze() + burner() + bumps() + pops() + pliers() + bag() + sizzle()


def record(dry):
    """Band limitation: a steep low-pass, the phone's, removes the top of the spectrum."""
    return signal.sosfilt(signal.ellip(10, .2, 80, TOP_HZ, fs=SR, output="sos"), dry)


dry = scene()
out = record(dry)
put_to_file(out)
```